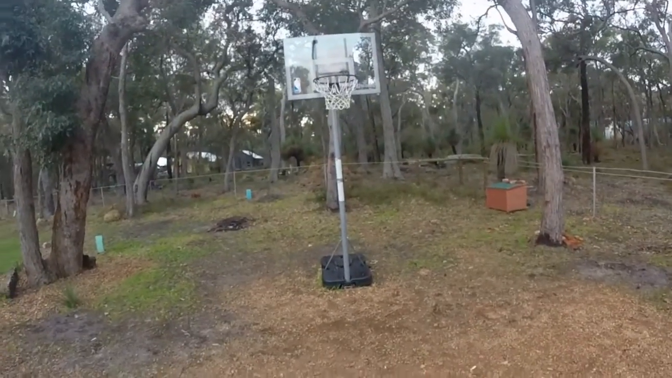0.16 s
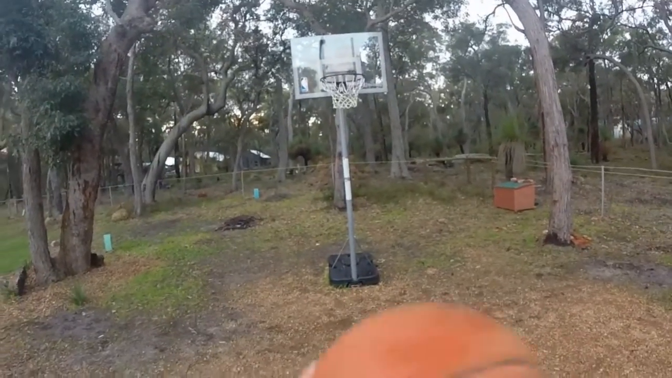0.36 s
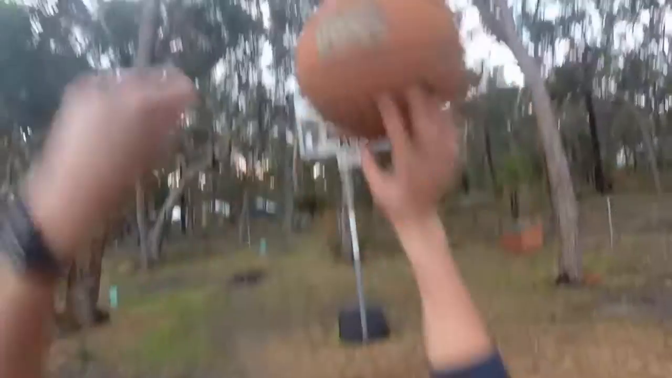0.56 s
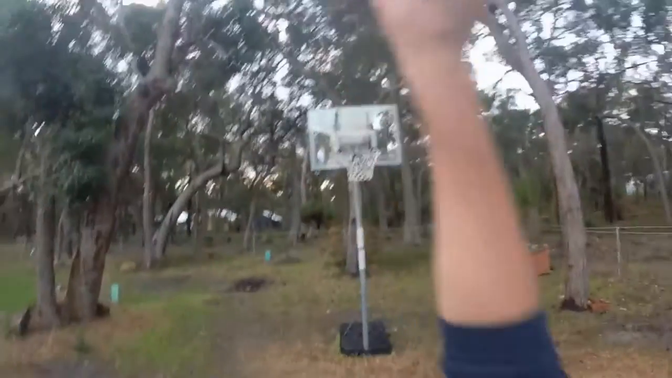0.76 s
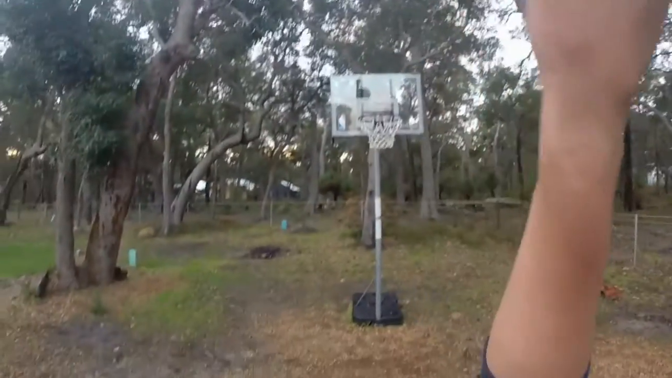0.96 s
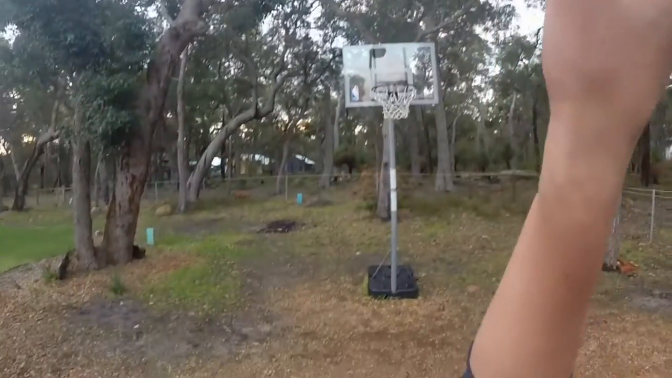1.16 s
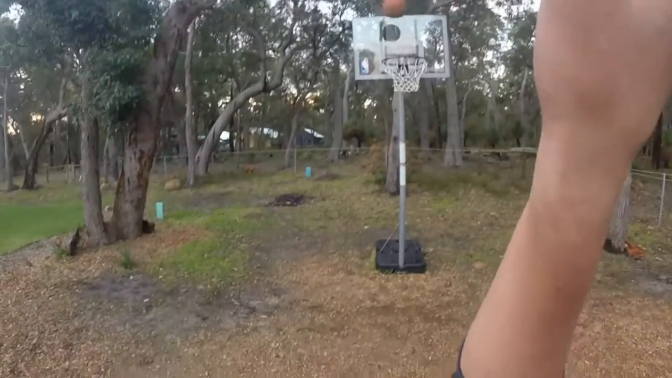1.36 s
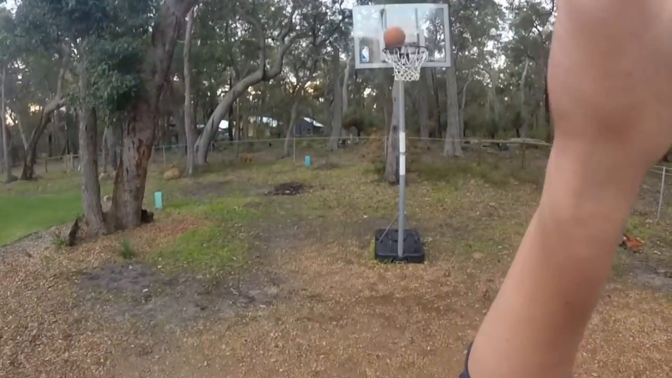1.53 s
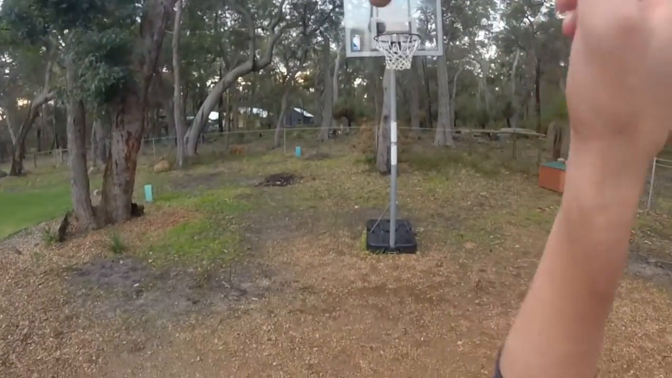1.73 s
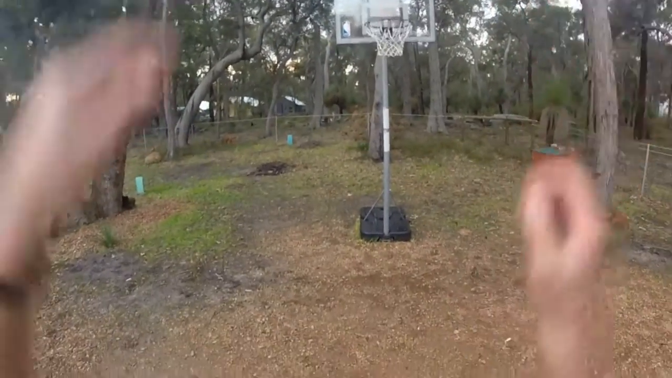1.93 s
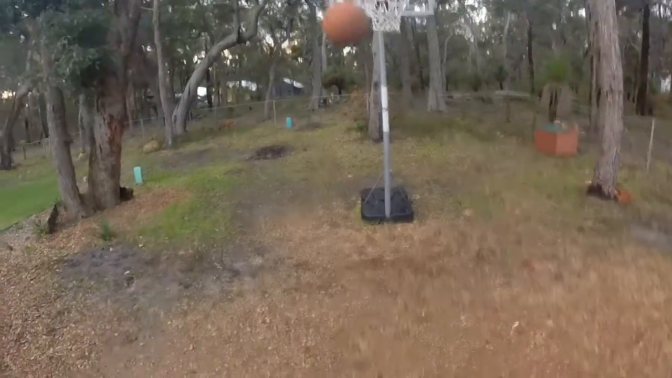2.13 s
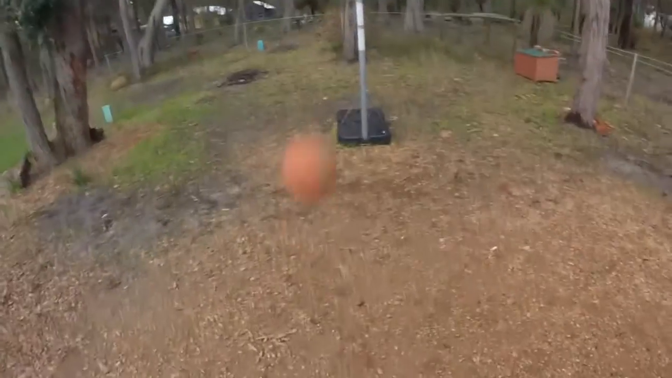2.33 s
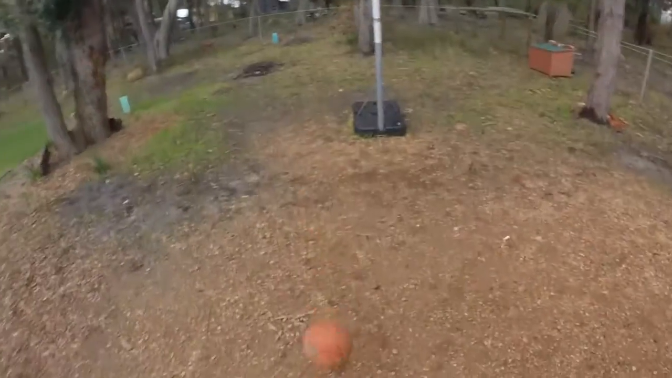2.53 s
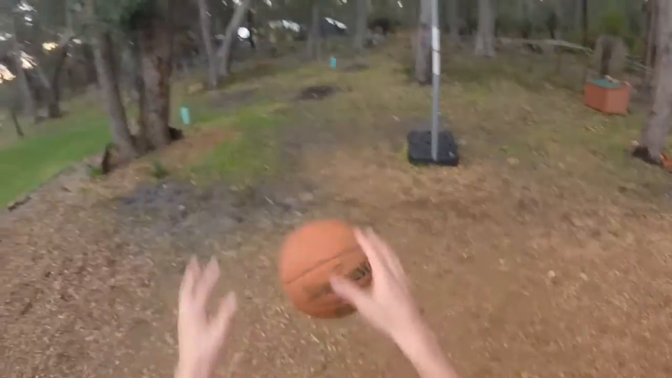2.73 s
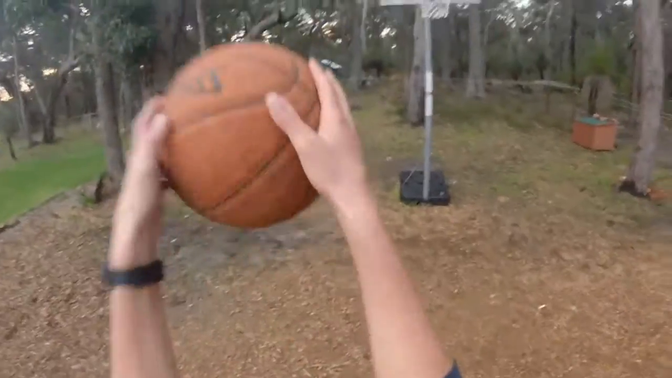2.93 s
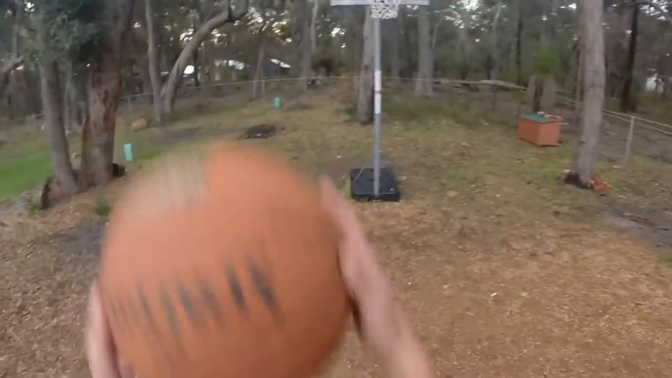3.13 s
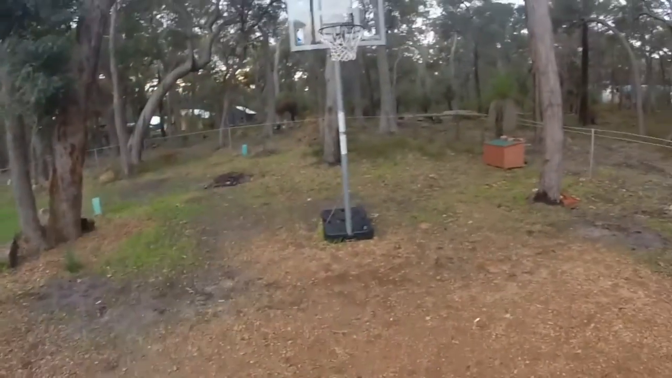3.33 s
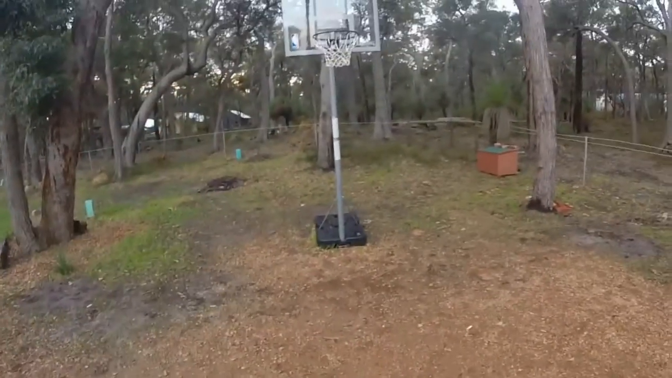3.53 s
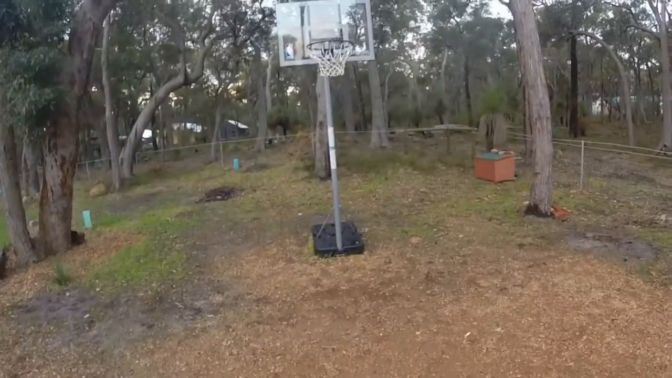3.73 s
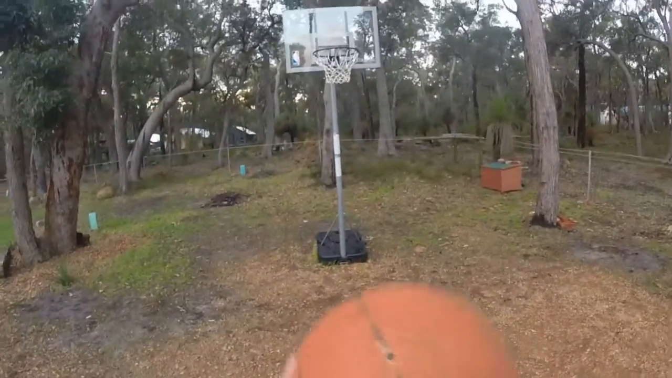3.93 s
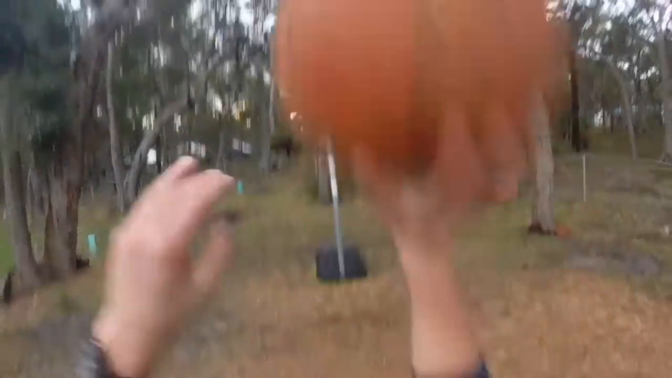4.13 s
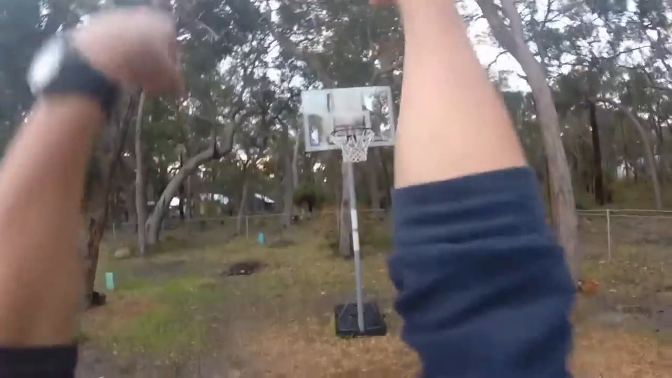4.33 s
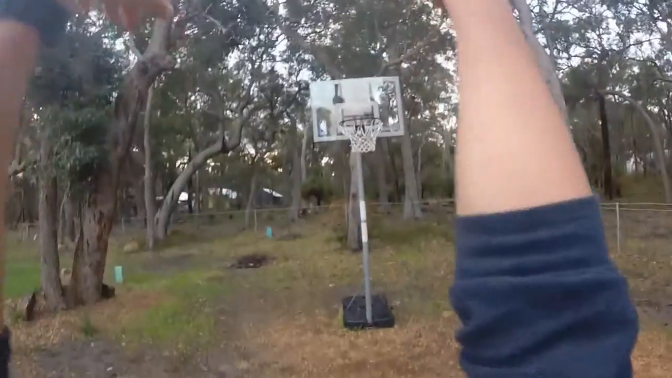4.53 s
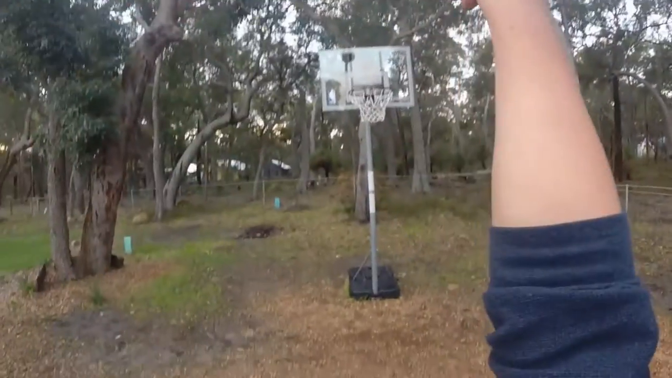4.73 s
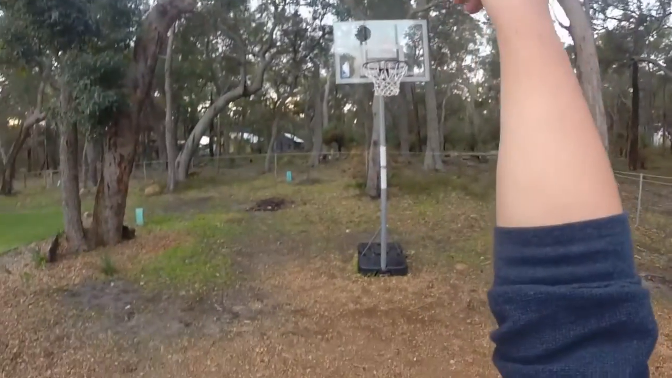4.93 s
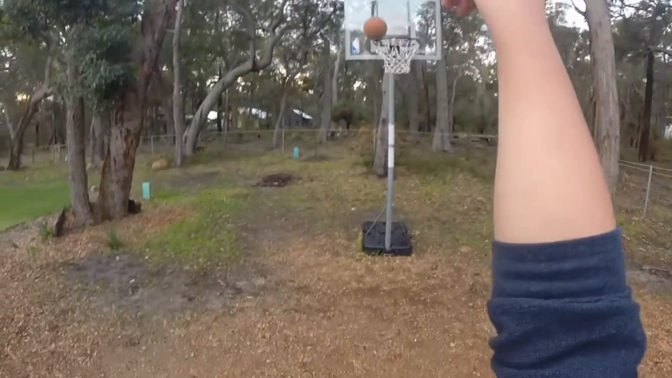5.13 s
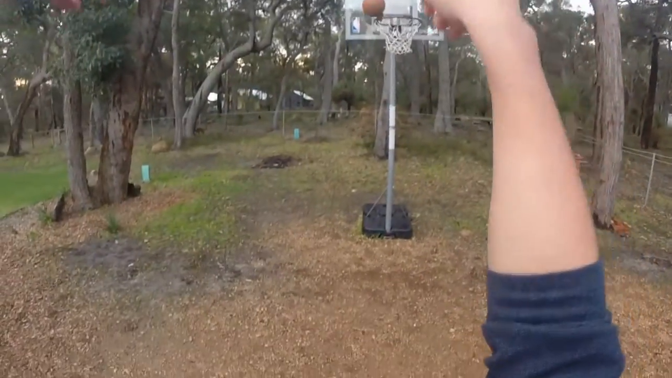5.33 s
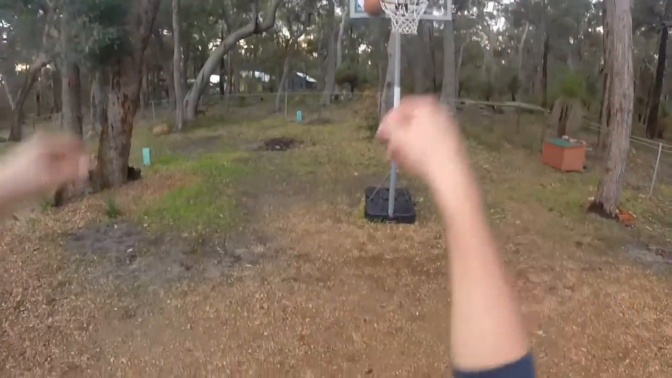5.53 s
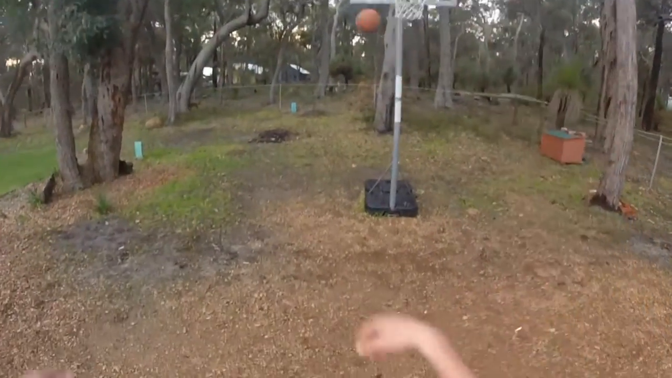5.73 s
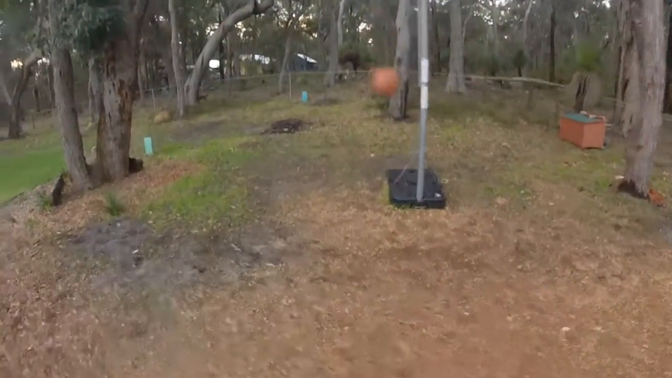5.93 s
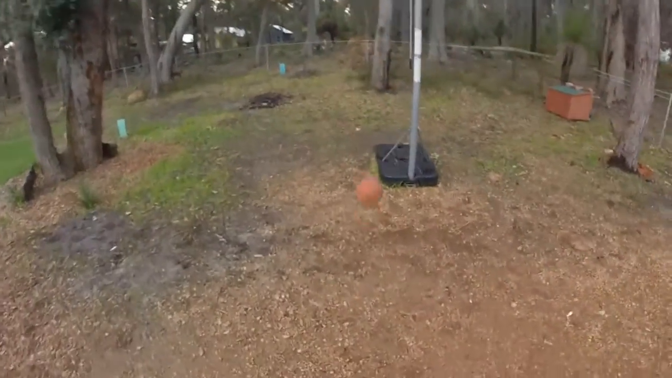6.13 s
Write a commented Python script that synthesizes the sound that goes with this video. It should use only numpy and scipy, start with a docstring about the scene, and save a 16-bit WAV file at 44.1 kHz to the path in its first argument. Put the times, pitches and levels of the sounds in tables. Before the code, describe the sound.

Close head-worn microphone outdoors, faint air in the trees. Cloth rustle and tiny ticks, then a boomy backboard hit with bright shaking hardware, light rim knocks and a lingering low metal hum. One heavy, hollow ball thump on packed earth nearby, then a rapid cluster of palm pats. Quiet handling and sleeve rustle follow, before a harder, more clattering rim hit with smaller knocks, a spring twang and shifting feet.

```python
"""Basketball shots in a quiet yard

Two shots at a portable hoop among trees, heard from the thrower's head: ringing modes make board, rim,
frame and pole, the pole humming on for seconds; randomly colliding noise makes rattling fittings.
Between them the ball bounces once on hard dirt close by, a cosine thump with noise and ringing air,
and is caught in short noise taps. Sleeves swish, feet shift, and air and a far bird note lie behind."""
import sys
import numpy as np
from scipy import signal
from scipy.fft import rfft, irfft, next_fast_len
from scipy.io import wavfile
from scipy.ndimage import uniform_filter1d, map_coordinates

SR = 44100
rng = np.random.default_rng(int(sys.argv[2]) if len(sys.argv) > 2 else 0)


def inscribe(sig):
    """Save sig as 16-bit PCM at rate SR to the path in sys.argv[1].

    A 1-D sig is mono; a 2-D sig holds one channel per row.
    Samples are clipped to [-1, 1] before scaling.
    """
    pcm = np.round(np.clip(np.atleast_2d(sig).T, -1, 1) * 32767)
    wavfile.write(sys.argv[1], SR, pcm.astype(np.int16))


N = 272538  # length in samples

# The ball meets the hoop: (time [s], board level [dB], rim level [dB], frame level [dB], pole level [dB],
# frame ring length [share], clatter level [dB], jangle level [dB], jangle hold [s])
SHOT_HITS = [(1.554, -13.5, -37, -23.5, -27, 1, -20, -20.5, .135),
             (5.215, -16.5, -12.5, -17.5, -35.5, 0.6, -9, -15.5, .047)]
# The ball touches the rim and pulls the net; a rolling touch rises slowly:
# (time [s], rattle level [dB], net level [dB], rise [s])
RIM_KNOCKS = [(1.742, -28, -26.5, 0.0017), (1.835, -24.5, -41.5, 0.018), (1.902, -29, -48, 0.0052),
              (2.02, -21, -35.5, 0.031), (2.139, -36.5, -66, 0.0082), (2.315, -36, -61, 0.014),
              (5.2, -21.5, -46, 0.0037), (5.387, -29.5, -33.5, 0.006), (5.441, -33, -43, 0.013),
              (5.5, -27.5, -39, 0.00084), (5.528, -20.5, -35, 0.015), (5.755, -24.5, -42.5, 0.0087),
              (5.903, -30, -36, 0.0064)]


def amp(db):
    """Decibels to gain."""
    return 10 ** (np.asarray(db) / 20)


def unit(x):
    """Scale to rms 1."""
    return x / np.sqrt(np.mean(x ** 2) + 1e-20)


def along(points, hz):
    """Read (frequency [Hz], value) points on a log frequency axis."""
    f, v = np.transpose(points)
    return np.interp(np.log(hz + 1), np.log(f), v)


def curve(points):
    """A noise colour drawn through (frequency [Hz], density [dB per Hz]) points."""
    return lambda hz: along(points, hz)


def bump(pitch, width, skirt_db):
    """A noise colour with one rounded peak: width in octaves, skirt in dB per octave."""
    return lambda hz: -skirt_db * (np.hypot(np.log2(hz / pitch), width) - width)


def clock(size):
    """Seconds for size samples."""
    return np.arange(size) / SR


def add(track, s, sound):
    """Mix a sound into a track from time s on."""
    part = track[round(s * SR):][:len(sound)]
    part += sound[:len(part)]


def noise(colour, size):
    """Random-phase noise of rms 1 whose dB per Hz is a function of frequency."""
    hz = np.fft.rfftfreq(size, 1 / SR) + 1
    phases = np.exp(2j * np.pi * rng.random(len(hz)))
    return unit(irfft(amp(colour(hz)) * phases, size))


def burst(colour, envelope):
    """Coloured noise under an envelope; it carries the energy of that envelope."""
    sound = noise(colour, len(envelope)) * envelope
    return sound * np.linalg.norm(envelope) / np.linalg.norm(sound)


def taps(table, t60, width, skirt_db):
    """Dead contacts: a short noise burst around one pitch; low ones start softly."""
    out, t = np.zeros(N), clock(SR // 2)
    for s, db, pitch in table:
        onset = -np.expm1(-(2 * t * pitch) ** 2)
        add(out, s, burst(bump(pitch, width, skirt_db), amp(db - 60 * t / t60) * onset))
    return out


def ring(modes, t, attack, scatter=1):
    """Damped sine modes that build up over the attack; a rattling blow scatters their phases."""
    total = 0
    for hz, db, t60 in modes:
        phase = 2 * np.pi * (hz * t + scatter * rng.random())
        total = total + amp(db - 60 * t / t60) * np.sin(phase)
    return -np.expm1(-t / attack) * total


def diffuse(x, decays, build_up):
    """A dense noise tail in which each frequency dies at its own speed."""
    hz, t, z = signal.stft(rng.standard_normal(2 * SR), SR, nperseg=256)
    t60 = along(decays, hz)[:, None]
    level = np.sqrt(2 * np.log(1000) / (t60 * SR))  # evens out the energy of long and short tails
    tail = signal.istft(z * amp(-60 * t / t60) * level, SR, nperseg=256)[1]
    onset = -np.expm1(-(clock(len(tail)) / build_up) ** 2)
    return signal.fftconvolve(x, tail * onset)[:N]


def chatter(t, rate, spread_db, life):
    """Envelope of parts colliding at random, each contact swelling for about a millisecond and dying."""
    hits = rng.random(len(t)) < rate / SR
    contacts = hits * amp(spread_db * rng.standard_normal(len(t))) ** 2
    # a steady floor keeps the envelope open between contacts
    power = signal.lfilter([1], [1, -np.exp(-1 / (life * SR))], contacts + rate / SR / 2)
    size = np.sqrt(power / np.abs(uniform_filter1d(power, size=1800)))
    return uniform_filter1d(uniform_filter1d(size, size=30), size=30)


def yard():
    """Faint drifting noise for air in the trees and one thin, wavering sine for a far bird note."""
    # colour of the air: (frequency [Hz], density [dB per Hz])
    air_colour = [(12, -41), (20, -27.5), (49, 3), (103, -9), (119, -10), (225, -15), (298, -16.5),
                  (333, -17), (519, -17.5), (705, -18.5), (1010, -19.5), (2330, -28), (7730, -39.5),
                  (14300, -53), (15500, -60)]
    air_db = -51
    t = clock(N)
    drift = map_coordinates(rng.standard_normal(40), [t * 4])  # four random points a second
    air = amp(air_db + 0.6 * drift) * noise(curve(air_colour), N)
    bird_hz = 7820 + 25 * noise(lambda hz: -hz / 4, N)
    note = np.sin(2 * np.pi * np.cumsum(bird_hz) / SR)
    return air + amp(-74) * note * np.exp(-((t - 1.42) / .045) ** 4)


def footsteps():
    """Footfalls are low, soft-edged bursts of noise."""
    # footfalls: (time [s], level [dB], pitch [Hz])
    footfalls = [(.36, -43, 50.6), (.857, -43, 66.5), (1.03, -46, 68.4), (5.58, -29.5, 84), (5.77, -34, 78),
                 (5.91, -33.5, 81), (6.02, -34, 50.6)]
    return taps(footfalls, t60=0.53, width=0.58, skirt_db=18.5)


def sleeves():
    """Cloth fibres catch and slip, swelling with each arm movement."""
    # throw, turn the ball, gather it, lower it, throw:
    # (time of top speed [s], level [dB], rise time constant [s])
    arm_moves = [(0.641, -39.5, 0.042), (3.062, -51, 0.048), (3.154, -42, 0.065), (3.43, -44, 0.091),
                 (4.245, -45.5, 0.11)]
    # colour of the cloth: (frequency [Hz], density [dB per Hz])
    cloth_colour = [(180, -26), (300, -5.5), (692, 1.5), (762, 2), (970, 7), (1680, -8.5), (3510, -10),
                    (3810, -22), (5330, -19.5), (14000, -73)]
    fall_share = 0.57  # an arm stops faster than it starts
    t, speed = clock(N), 0
    for s, db, rise in arm_moves:
        slope = np.where(t < s, rise, rise * fall_share)
        speed = speed + amp(db) * np.exp(-np.abs(t - s) / slope)
    friction = chatter(t, rate=720, spread_db=4.0, life=0.0049)
    return speed * friction * noise(curve(cloth_colour), N)


def small_ticks():
    """Fingers, grit and twigs tick as tiny dead contacts."""
    # ticks: (time [s], level [dB], pitch [Hz])
    tick_hits = [(.413, -47, 2630), (.489, -43, 1690), (.646, -36, 1510), (.896, -46, 1910),
                 (1.094, -48, 1610), (2.753, -50.5, 5840), (2.815, -49.5, 5500), (4.253, -38.5, 2100),
                 (5.987, -39, 1630)]
    return taps(tick_hits, t60=0.025, width=0.21, skirt_db=15.5)


def catch():
    """Each touch of a hand is a dead thud plus a clap of skin on the ball."""
    # palms land low and loud, fingers settle higher and softer:
    # (time [s], thud level [dB], thud pitch [Hz], clap level [dB])
    hand_pats = [(2.8565, -10.5, 250, -25), (2.8726, -12.5, 260, -26), (2.883, -17, 500, -25),
                 (2.9004, -12.5, 420, -23), (2.9059, -12.5, 513, -16.5), (2.9725, -30.5, 595, -37),
                 (2.997, -31.5, 1490, -38), (3.021, -36.5, 1720, -54), (3.083, -29, 710, -47)]
    # colour of the clap: (frequency [Hz], density [dB per Hz])
    clap_colour = [(300, -8), (800, 4), (1170, 7.5), (1600, -7), (2300, -12), (3000, -19.5), (4200, -32),
                   (14000, -54)]
    clap_t60 = 0.04  # s
    out = taps([pat[:3] for pat in hand_pats], t60=0.027, width=0.11, skirt_db=28.0)
    t = clock(SR // 4)
    for s, *_, clap_db in hand_pats:
        envelope = amp(clap_db - 60 * t / clap_t60) * -np.expm1(-t / 0.00094)
        add(out, s, burst(curve(clap_colour), envelope))
    return out


def bounce():
    """The ball squashes and springs back in one heavy thump; its skin smacks the dirt and its air rings."""
    # the ball on the dirt: (time [s], level [dB], thump pitch [Hz], contact [s])
    dirt_hits = [(2.5586, -3, 124, 0.012)]
    # shell and enclosed air: (frequency [Hz], level [dB], t60 [s])
    ball_modes = [(335, -17, 0.11), (495, -10, 0.1), (760, -10, 0.049), (1084, -28.5, 0.31),
                  (1200, -21, 0.032), (1460, -21, 0.044), (1590, -39, 0.2), (2040, -22, 0.014),
                  (2380, -24, 0.031), (2623, -9.5, 0.018), (2750, -45, 0.3)]
    # colour of skin on dirt: (frequency [Hz], density [dB per Hz])
    smack_colour = [(180, -41), (300, -9.5), (597, -0.5), (1250, -18), (1490, -13.5), (1820, -42),
                    (2560, -32), (3070, -57), (5800, -61), (6400, -41), (15000, -92)]
    crack_colour = [(500, -42), (2500, 17), (4000, -7), (14000, -31)]
    ground_colour = [(60, -1), (250, 4), (550, 3.5), (1100, -2.5), (1600, -11), (3200, -16),
                     (4500, -27), (14000, -66)]
    out, t = np.zeros(N), clock(SR // 2)
    onset = -np.expm1(-t / 0.00018)
    for s, db, thump_hz, contact in dirt_hits:
        squash = np.cos(2 * np.pi * thump_hz * t) * np.exp(-(t / contact) ** 6) * onset
        smack = burst(curve(smack_colour), onset * amp(-5.5 - 60 * t / 0.049))
        crack = burst(curve(crack_colour), onset * amp(-12.5 - 60 * t / 0.023))
        # the ground all around scatters a quickly fading hush
        hush = burst(curve(ground_colour), onset * amp(-19.5 - 60 * t / 0.22))
        air_ring = ring(ball_modes, t, attack=0.00024, scatter=0)
        add(out, s, amp(db) * (squash + smack + crack + hush + air_ring))
    return out


def net_pull(db, rise):
    """Cords snap against the rim, thickest as the net comes taut."""
    t = clock(SR // 4)
    taut = rise + 0.001  # s
    snaps = chatter(t, rate=200, spread_db=3, life=.002)
    envelope = amp(db) * snaps * np.exp(-1.5 * (t / taut - 1) ** 2)
    return burst(bump(1990, width=0.69, skirt_db=55), envelope)


def rattle(db, bright, rise, hold, t60):
    """Loose fittings chatter against the board: attack, hold, release; bright tilts in dB per octave."""
    # base colour of the rattle: (frequency [Hz], density [dB per Hz])
    clatter_colour = [(53, -44), (90, -16.5), (182, -3), (226, -5.5), (268, -2), (532, -16.5), (673, -5),
                      (908, -15), (1060, -8), (1360, -25), (2540, -23.5), (3420, -27), (4150, -34.5),
                      (6940, -34.5), (15000, -50)]
    # resonances of the fittings: (frequency [Hz], width [Hz], gain [dB])
    fitting_peaks = [(410, 29, 2.5), (692, 26, -14.5), (1098, 450, 1), (1800, 380, -1.5), (2400, 400, -0.5),
                     (3400, 180, 6.5), (5430, 450, 4.5), (6840, 990, 5)]
    low_cut = [(70, -64), (130, -0.5), (220, -1.5)]  # small parts radiate little bass
    t = clock(next_fast_len(int((hold + t60 + .1) * SR)))

    def colour(hz):
        """Base colour, fitting peaks and tilt."""
        peaks = sum(gain / (1 + (2 * (hz - f) / w) ** 2) for f, w, gain in fitting_peaks)
        body = along(clatter_colour, hz) + peaks + along(low_cut, hz)
        tilt = bright * np.log2(np.clip(hz, 150, 6000))
        # softer rattles lose more of the highest treble
        softness = .5 * min(db - 3, 0) * np.log2(np.maximum(hz / 5000, 1))
        return body + tilt + softness

    contacts = chatter(t, rate=450, spread_db=3.3, life=.0025)
    release = amp(db - 60 * np.maximum(t - hold, 0) / t60)
    return burst(colour, contacts * release * -np.expm1(-t / rise))


def hoop_rattle():
    """Shots and knocks shake fittings, net and hooks, the ball's skin slaps, and the frame shudders on."""
    # the ball's skin slaps board or rim: (time [s], level [dB])
    skin_slaps = [(1.5539, -9.5), (1.579, -16.5), (5.2267, -8), (5.502, -30)]
    # colour of the slap: (frequency [Hz], density [dB per Hz])
    skin_colour = [(120, -10), (300, 0), (600, 0), (1300, -11), (2400, -8), (4000, -21), (6500, -21),
                   (9000, -38), (15000, -62)]
    # loose steel hooks chink on the rim: (time [s], level [dB])
    hook_chinks = [(1.62, -41), (1.68, -41), (5.25, -41), (5.41, -49), (5.716, -48)]
    # modes of the hooks: (frequency [Hz], level [dB], t60 [s])
    hook_modes = [(3435, -2, .18), (3480, 0, .2), (3537, -1, .2), (3580, -6, .15), (2518, -9, .15),
                  (6692, -16, .15)]
    # ring-out of the whole frame: (frequency [Hz], t60 [s])
    shudder_decay = [(100, 6.2), (300, 3.63), (1000, 1.98), (3400, 0.24), (7000, 0.35), (14000, 0.73)]
    slap_t60, slap_rise = 0.0061, .0004  # s
    out, t = np.zeros(N), clock(SR // 2)
    for s, *_, clatter_db, jangle_db, hold in SHOT_HITS:
        # the board clatters at once, dully
        add(out, s, rattle(clatter_db, bright=0.17, rise=0.00093, hold=0, t60=.14))
        # the fittings shake loose and jangle brightly
        add(out, s, rattle(jangle_db, bright=0.65, rise=0.27 * hold, hold=hold, t60=.15))
        # the swaying frame keeps a duller rattle going
        add(out, s, rattle(jangle_db - 11.5, bright=-.3, rise=hold, hold=0, t60=1.8))
    for s, db, net_db, rise in RIM_KNOCKS:
        add(out, s, rattle(db, bright=-1.06, rise=rise, hold=0, t60=.28))
        add(out, s, net_pull(net_db, rise))
    for s, db in hook_chinks:
        contacts = chatter(t, rate=180, spread_db=1.5, life=.002)
        add(out, s, amp(db) * ring(hook_modes, t, attack=0.0025) * contacts)
    for s, db in skin_slaps:
        envelope = amp(db - 60 * t / slap_t60) * -np.expm1(-(t / slap_rise) ** 2)
        add(out, s, burst(curve(skin_colour), envelope))
    return out + amp(-9.0) * diffuse(out, shudder_decay, build_up=0.004)


def hoop_ring():
    """Shots ring board and rim by where they land; frame and heavy pole hum on; knocks ring lightly."""
    # modes of the hoop's parts: (frequency [Hz], level [dB], t60 [s])
    board_modes = [(150, 0, .29), (210, -7, .3), (289, -7, .25), (325, -9, .25), (370, -7, .25),
                   (477, -4, .25), (636, -9, .25), (832, -14, .4)]
    rim_modes = [(263.5, -5, .4), (334, -3, .25), (368, 0, .25), (660.5, 2, .26), (687, -5, .25),
                 (757, -9, .3), (792, -10, .27), (985, -9, .25), (1013.5, -1, .25), (1065, -7, .27),
                 (1087, -1, .32), (1204, -12, .25), (2518, -17, .25), (5415, -24, .2)]
    pole_modes = [(43.1, -2, 8), (57.5, -11, 6), (63, -8, 5.5)]
    # modes of the frame: (frequency [Hz], level [dB], t60 at full ring length [s])
    frame_modes = [(97, -15, 3.6), (121.5, -18, 3), (163.2, -2, 3.3), (167, -8, 1.9), (194.3, 2, 1.9),
                   (243, -11, 1.1), (260, -6, 1.1), (281, -6, 1.3), (329, -11, 1.7), (347, -8, .8),
                   (578, -12, 1.3), (682, -14, 1.7), (722, -15, 1.8), (763, -11, 1.3), (787, -12, 1.1),
                   (832, -16, 1.3), (1126, -14, 1.2)]
    # the ball drags on the net and the rim's spring twangs: (time [s], level [dB], t60 [s])
    spring_twangs = [(2.034, -23.5, 0.42), (5.49, -28.5, 1.48)]
    spring_hz = 425.5
    knock_board_db, knock_rim_db = -9.5, -11.5  # ring of each part against the knock's rattle
    out, t = np.zeros(N), clock(N)
    for s, board_db, rim_db, frame_db, pole_db, length, *_ in SHOT_HITS:
        shot_frame = [(hz, db, t60 * length) for hz, db, t60 in frame_modes]
        add(out, s, amp(board_db) * ring(board_modes, t, attack=0.003))
        add(out, s, amp(rim_db) * ring(rim_modes, t, attack=0.0072))
        add(out, s, amp(frame_db) * ring(shot_frame, t, attack=0.014))
        add(out, s, amp(pole_db) * ring(pole_modes, t, attack=0.031))
    for s, db, t60 in spring_twangs:
        add(out, s, ring([(spring_hz, db, t60)], t, attack=0.028))
    t = clock(SR // 2)
    for s, db, _, rise in RIM_KNOCKS:
        add(out, s, amp(db + knock_board_db) * ring(board_modes, t, attack=rise))
        add(out, s, amp(db + knock_rim_db) * ring(rim_modes, t, attack=rise))
    return out


def scene():
    """Everything in the yard, with the trees scattering the sharp sounds back."""
    # ring-out among the trees: (frequency [Hz], t60 [s])
    tree_decay = [(100, 0.57), (500, 0.4), (1200, 1), (3000, 0.97), (8000, .3)]
    ball = bounce()
    hoop = hoop_ring() + hoop_rattle()
    hands = catch() + small_ticks()
    sent = amp(-17.5) * ball + amp(-13) * hands + amp(-32.5) * hoop
    echo = diffuse(sent, tree_decay, build_up=0.0041)
    return (yard() + footsteps() + sleeves() + hands + ball + hoop + echo)[None]


def record(dry):
    """Round off the highest peaks with a soft limit and keep nothing above the band limit."""
    top_hz = 15100
    held = dry / (1 + np.abs(dry) ** 8) ** (1 / 8)
    size = next_fast_len(N + SR // 2)
    passed = np.fft.rfftfreq(size, 1 / SR) < top_hz
    return irfft(rfft(held, size) * passed, size)[:, :N]


dry = scene()
out = record(dry)
inscribe(out)
```